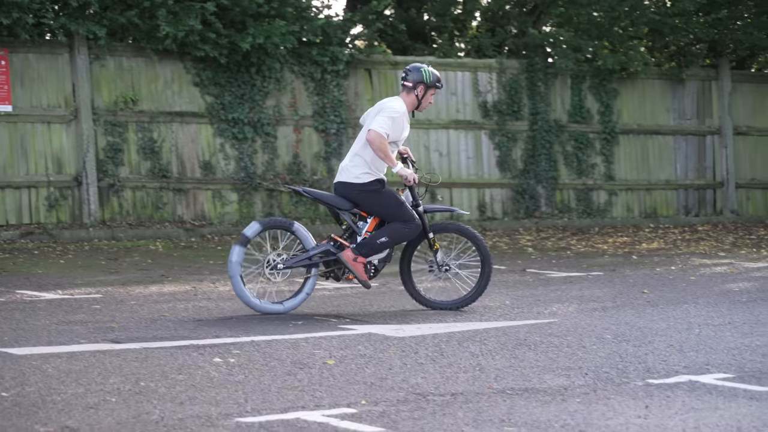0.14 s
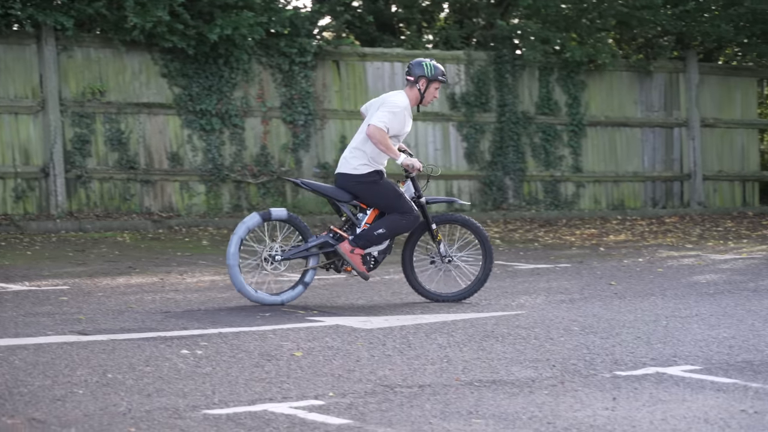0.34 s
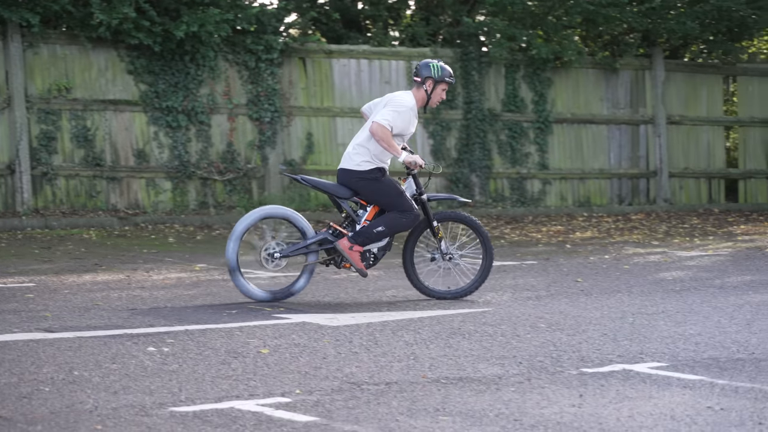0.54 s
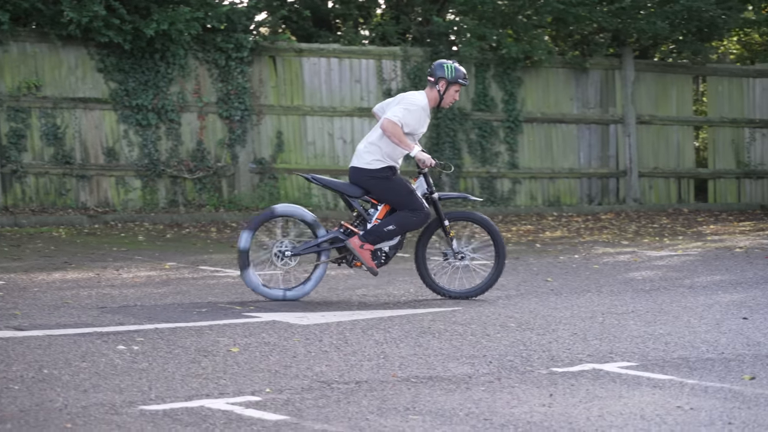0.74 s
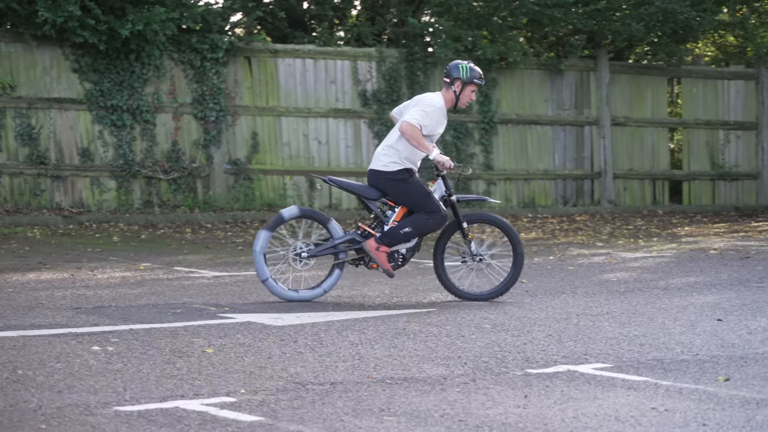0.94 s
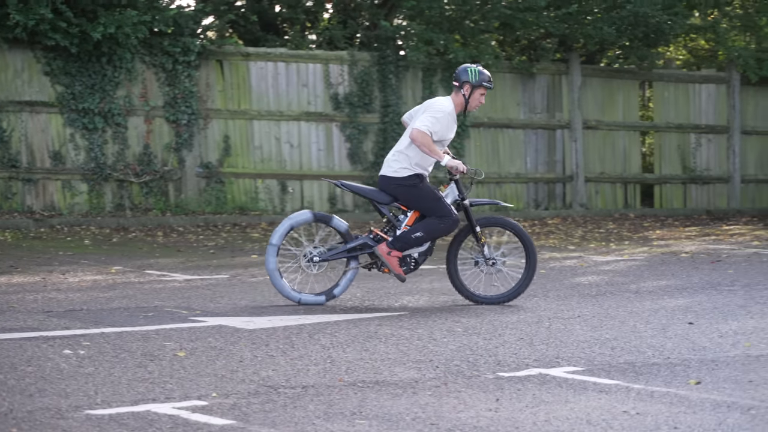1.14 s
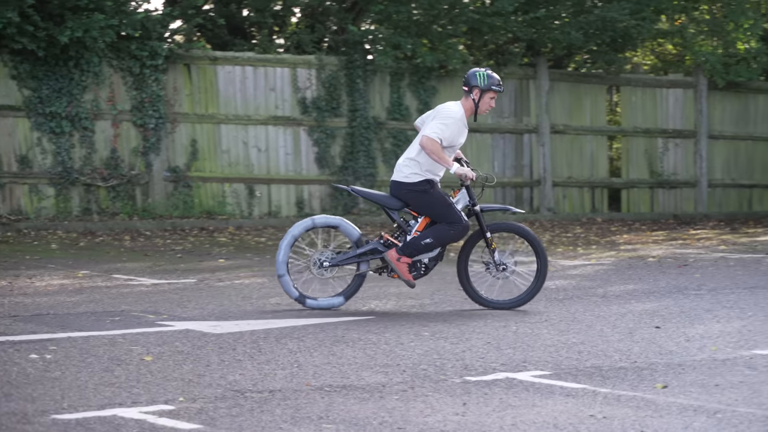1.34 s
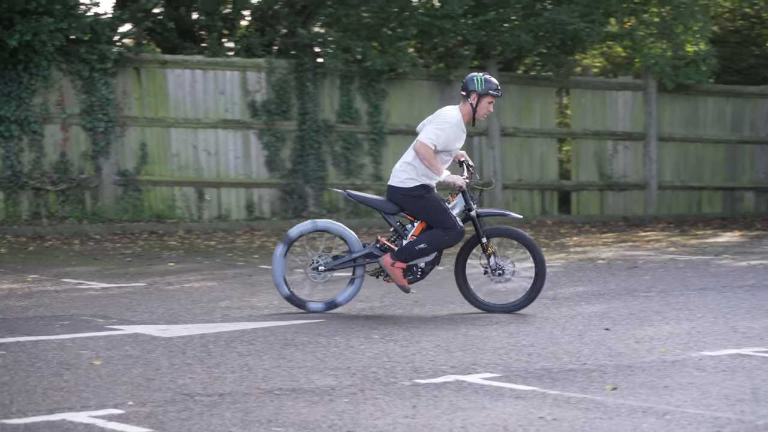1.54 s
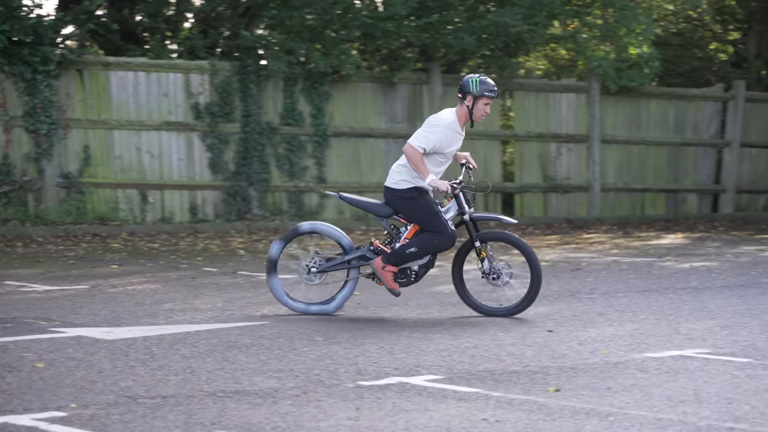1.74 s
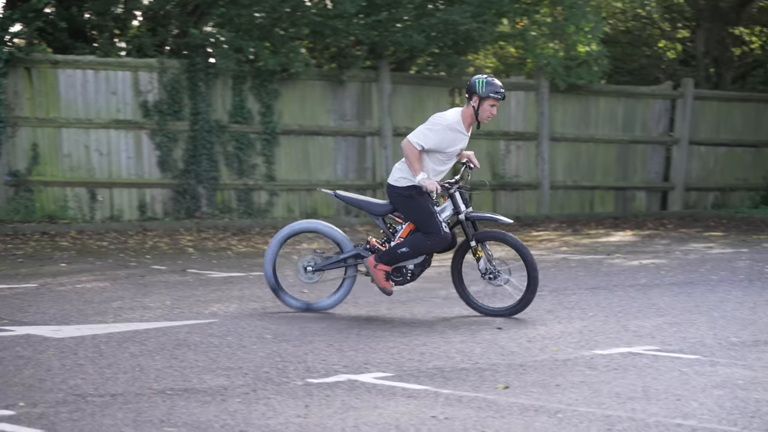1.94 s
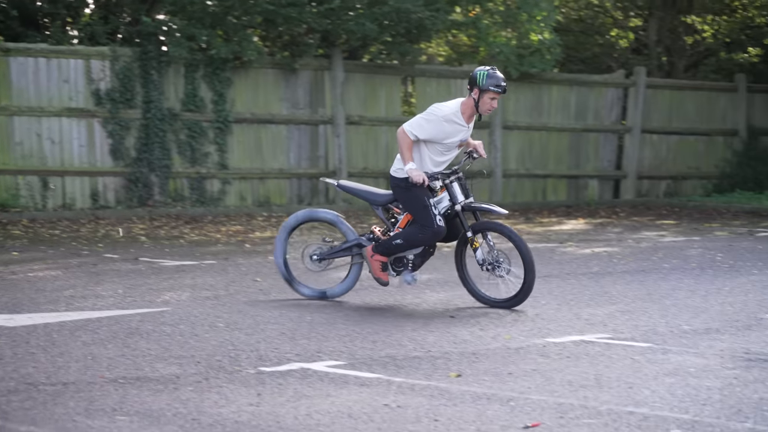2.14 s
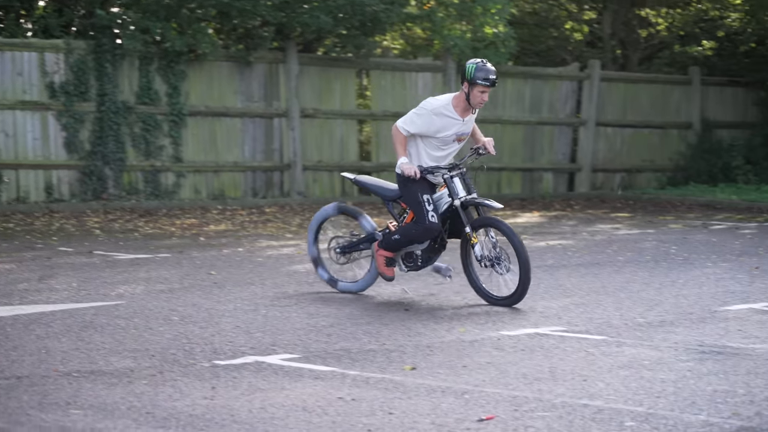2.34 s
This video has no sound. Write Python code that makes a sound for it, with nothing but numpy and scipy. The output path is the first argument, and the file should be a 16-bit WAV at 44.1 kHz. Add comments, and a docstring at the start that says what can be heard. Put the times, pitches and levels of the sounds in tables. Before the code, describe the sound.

Plastic scrapes and cracks on tarmac around a motorbike's spinning rear wheel.

```python
"""An electric motorbike spins its rear wheel, wrapped in plastic guttering, on an open car park's tarmac.
The plastic cracks and scrapes over grit, ringing its hollow wall.
A stick-slip creak, perhaps the brake, ends in single snaps.
One microphone hears the wheel with its low thumps and faint reflections, and a rumble in the distance.
A limiter holds the peaks."""
import sys
import numpy as np
from scipy import signal
from scipy.fft import rfft, irfft
from scipy.io import wavfile
from scipy.ndimage import uniform_filter1d, minimum_filter1d, map_coordinates

SR = 44100
rng = np.random.default_rng(int(sys.argv[2]) if len(sys.argv) > 2 else 0)


def file_out(sig):
    """Save sig as 16-bit WAV at sys.argv[1]."""
    # one column per channel
    cols = np.atleast_2d(sig).T
    # limit, then scale
    lim = np.clip(cols, -1, 1)
    pcm = np.round(lim * 32767).astype(np.int16)
    wavfile.write(sys.argv[1], SR, pcm)


N = 110250

# Scrapes on the tarmac. Each row: start and length in seconds, relative body, rasp and hiss levels in dB.
SCRAPES = [(0.191, 0.0096, -60, -44, -29), (0.431, 0.086, -31.5, -37, -59), (0.486, 0.011, -41, -22.5, -20),
           (0.523, 0.031, -19, -19, -24.5), (0.608, 0.048, -15, -20, -27.5),
           (0.685, 0.039, -16, -21, -28.5), (0.744, 0.016, -23.5, -17.5, -29.5),
           (0.776, 0.028, -28.5, -19, -25.5), (0.797, 0.027, -22, -22.5, -23),
           (1.078, 0.032, -47, -31.5, -42), (1.475, 0.007, -25, -23, -32), (1.494, 0.024, -21, -23, -35),
           (1.527, 0.024, -17, -23, -28.5), (1.631, 0.029, -25, -36, -34.5),
           (1.762, 0.024, -18.5, -17, -26), (1.796, 0.038, -22, -16.5, -22),
           (1.857, 0.0052, -16.5, -16.5, -35), (1.924, 0.069, -26, -19, -25.5),
           (2.019, 0.089, -31, -16, -26.5), (2.189, 0.01, -16.5, -16.5, -28), (2.22, 0.055, -29, -21, -27),
           (2.319, 0.0093, -26, -17, -26.5)]
# Steady drag between scrapes. Each row: time in seconds, relative rasp and hiss levels in dB.
DRAG = [(0, -42, -49), (.14, -48, -52.5), (.34, -38, -45.5), (.47, -47, -49), (.57, -23.5, -26.5),
        (.82, -29, -34.5), (.98, -35, -44.5), (1.31, -48, -58.5), (1.57, -33, -37.5), (1.71, -30.5, -42),
        (1.85, -29, -28), (2.12, -24, -25), (2.5, -28.5, -34)]
# Cracking plastic and struck grit. Each row: start in seconds, pitch in Hz, relative ring and tick in dB.
CRACKS = [(0.038, 3720, -28.5, -28.5), (0.0873, 4060, -22.5, -14), (0.305, 1730, -23.5, -60),
          (0.69, 2300, -7.5, -43), (1.0284, 1520, -33.5, -23.5), (1.1523, 1450, -22.5, -41),
          (1.338, 2500, -29.5, -33), (1.408, 2750, -15.5, -25), (1.5021, 1040, -10, -24),
          (1.609, 1830, -19.5, -27.5)]
# Stick-slip creak. Each row: time in seconds, mean slips per second, relative level in dB.
CREAK = [(.275, 220, -43), (.31, 380, -45), (.345, 470, -34), (.375, 420, -29.5), (.387, 152, -23),
         (.434, 150, -20.5)]
# Single slips. Each entry: time in seconds.
SNAP_TIMES = [0.4445, 0.4628, 0.4792, 0.5197, 1.4552, 1.486, 1.5592, 1.7572]
# Hollow crunches. Each row: middle and half length in seconds, resonance in Hz, level in dB.
CRUNCHES = [(0.706, 0.02, 566, -18.5), (0.809, 0.019, 1010, -13), (0.914, 0.05, 1980, -30.5),
            (1.11, 0.019, 318, -34), (1.789, 0.024, 1080, -15.5), (2.029, 0.017, 890, -16.5),
            (2.239, 0.013, 790, -16.5)]
# Booms and squeaks of the buckling gutter. Each row: start in seconds, pitch in Hz, level in dB.
BUCKLES = [(0.623, 370, -11), (0.631, 594, -7), (1.656, 1210, -14), (1.986, 547, -6.5), (2.114, 4050, -14),
           (2.247, 3670, -16)]
# Wheel thumps. Each row: start in seconds, level in dB.
THUMPS = [(0.732, -17.5), (1.727, -24.5)]
# Tone of the gutter's hollow body, rasping wall and hissing edge; tone of the creak; tone of the open air.
# Each row: frequency in Hz, relative gain in dB.
BODY_SPECTRUM = [(70, -24.5), (150, -10), (260, 1.5), (380, -1), (490, -7), (570, 4), (700, -7), (900, -2),
                 (1400, -11), (3000, -49.5)]
RASP_SPECTRUM = [(450, -28), (950, -8), (1500, -3), (2400, -6), (3750, -7.5), (5200, -11), (7000, -18.5),
                 (16000, -45)]
HISS_SPECTRUM = [(2500, -36), (5000, -12.5), (7200, -5.5), (12500, -2.5), (16000, -4.5)]
CREAK_SPECTRUM = [(1500, -30), (4200, -22), (5100, -12), (5700, -6.5), (6200, -19), (7500, -16), (8200, -6),
                  (8900, 0), (10100, -5), (11000, -13), (16000, -23)]
OUTDOOR_SPECTRUM = [(20, -17.5), (62, 3), (120, -6.5), (450, -19), (800, -14.5), (1600, -13.5),
                    (2400, -33.5), (16000, -83)]
# Fade of the distant rumble. Each row: time in seconds, relative level in dB.
RUMBLE_FADE = [(1.75, 5), (2.05, -3)]


def scraping(attack_s=0.0043, release_s=0.01, judder_hz=169.75, judder_db=2):
    """Drag and scrapes drive juddering grit into the gutter's hollow body, wall and sharp edge."""
    rasp_db, hiss_db = curve(DRAG)
    body_db = rasp_db - 5.5
    power = undb([body_db, rasp_db, hiss_db]) ** 2
    for start, length, *levels_db in SCRAPES:
        press = np.minimum(since(start) / attack_s, 1) * np.exp(-since(start + length) / release_s)
        power += np.outer(undb(levels_db), press) ** 2
    judder = unit(undb(judder_db * walk(judder_hz)))
    body_drive, rasp_drive, hiss_drive = np.sqrt(power) * judder
    pops = undb(-5.5) * stones(rasp_drive, centre_hz=1890, decay_cycles=4.07)
    chips = stones(hiss_drive, centre_hz=8480, decay_cycles=6.1)
    body = drift(colour(grit() * body_drive, BODY_SPECTRUM))
    rasp = undb(-1) * colour(grit() * rasp_drive, RASP_SPECTRUM)
    hiss = colour(grit() * hiss_drive, HISS_SPECTRUM)
    return body + rasp + hiss + pops + chips


def grit(grains_per_s=3300, spread_db=2):
    """The plastic catches on stone tips in dense clicks of uneven size."""
    hits = rng.random(N) < grains_per_s / SR
    polarity = np.sign(rng.standard_normal(N))
    size = undb(spread_db * np.clip(rng.standard_normal(N), -2, 2))
    return unit(hits * polarity * size)


def stones(drive, centre_hz, decay_cycles, per_s=420, spread_octaves=1.84):
    """Larger stones flick the plastic, each ringing for a few cycles at its own pitch."""
    out = np.zeros(2 * N)
    age = since(0)[:SR // 20]
    for when, pitch, size in rng.random((int(per_s * N / SR), 3)):
        i = int(when * N)
        hz = min(centre_hz * 2 ** (spread_octaves * (2 * pitch - 1)), SR / 2)
        strength = drive[i] * (1 - np.log(1 - size))
        out[i:i + len(age)] += strength * np.exp(-age * hz / decay_cycles) * np.sin(2 * np.pi * hz * age)
    return out[:N]


def drift(x, spread_s=0.00151, rate_hz=24.99):
    """The resonances wander as the contact moves round the gutter."""
    warped_time = since(0) + spread_s * walk(rate_hz)
    return map_coordinates(x, [warped_time * SR], mode="nearest")


def cracks(burst_s=0.0055, tail_s=0.0042, tail_db=-17.5, body_share_db=-9.5):
    """Sharp bursts with a crumbling tail ring a piece of the plastic, its edge and the hollow body."""
    parts = 0
    for start, hz, ring_db, tick_db in CRACKS:
        age = since(start)
        burst = (age > 0) * (np.exp(-(age / burst_s) ** 2) + undb(tail_db) * np.exp(-age / tail_s))
        noise = rng.standard_normal((3, N))
        noise[0] = unit(signal.lfilter(*signal.iirpeak(hz, Q=3.4, fs=SR), noise[0]))
        levels = undb([ring_db, tick_db, ring_db + body_share_db])
        parts += burst * levels[:, None] * noise
    piece, edge, body = parts
    return undb(-1) * (piece + colour(edge, HISS_SPECTRUM) + colour(body, BODY_SPECTRUM))


def crunches():
    """The tyre crushes a stretch of gutter: grit swells into one broad resonance."""
    out = 0
    for middle, half_length, hz, db in CRUNCHES:
        wall = signal.iirpeak(hz, Q=1.6, fs=SR)
        ringing = signal.lfilter(*wall, signal.lfilter(*wall, grit()))
        press = np.exp(-((since(0) - middle) / half_length) ** 2)
        out += undb(db) * press * unit(ringing)
    return out


def buckling(rise_s=0.0032, pitch_spread_hz=58.8):
    """The gutter buckles with brief, wavering booms and squeaks."""
    waver = pitch_spread_hz * np.cumsum(walk(150)) / SR
    return sum(undb(db) * swell(start, rise_s) * np.sin(2 * np.pi * (hz * since(start) + waver))
               for start, hz, db in BUCKLES)


def creak(jitter=0.07, chatter_s=0.0013):
    """Stick-slip pulses, perhaps the brake, quicken, then slow and grow, ending in single snaps."""
    rate, level_db = curve(CREAK)
    creaking = (since(CREAK[0][0]) > 0) & (since(CREAK[-1][0]) == 0)
    slip_count = np.cumsum(rate * (1 + jitter * walk(280)) * creaking) / SR
    slips = np.diff(np.floor(slip_count), prepend=0) * undb(level_db)
    for start in SNAP_TIMES:
        slips[int(start * SR)] += undb(-16)
    chatter = smear(slips, np.exp(-since(0) / chatter_s)) * rng.standard_normal(N)
    return undb(17.5) * colour(slips + undb(-1) * chatter, CREAK_SPECTRUM)


def thumps(hz=50, rise_s=0.0057):
    """The wheel thumps, each time a deep tone that dies within a few cycles."""
    return sum(undb(db) * swell(start, rise_s) * np.sin(2 * np.pi * hz * since(start))
               for start, db in THUMPS)


def reflections(wheel, level_db=-17.5, decay_s=0.011):
    """The car park returns a faint, short, diffuse tail to the microphone."""
    tail = rng.standard_normal(N) * np.exp(-since(0) / decay_s)
    return undb(level_db) * smear(wheel, tail)


def outdoors():
    """Low rumble and a soft rush from far off, fading near the end."""
    level_db = curve(RUMBLE_FADE)[0] - 39
    return undb(level_db) * colour(rng.standard_normal(N), OUTDOOR_SPECTRUM)


def undb(db):
    """Decibels to amplitude."""
    return 10 ** (np.asarray(db) / 20)


def unit(x):
    """Scale to rms 1."""
    return x / np.sqrt(np.mean(x ** 2))


def since(start):
    """Seconds since a moment, zero before it."""
    return np.maximum(np.arange(N) / SR - start, 0)


def curve(table):
    """Each level or rate column of a table over time."""
    times, *columns = np.array(table, float).T
    return [np.interp(since(0), times, column) for column in columns]


def walk(hz):
    """Smooth random motion of rms 1."""
    return unit(np.interp(since(0) * hz, np.arange(N), rng.standard_normal(N)))


def swell(start, rise_s):
    """A push that peaks at 1 after the rise time and dies away."""
    rises = since(start) / rise_s
    return rises * np.exp(1 - rises)


def smear(x, tail):
    """Convolve with a tail scaled to unit energy."""
    return signal.fftconvolve(x, tail / np.linalg.norm(tail))[:N]


def colour(x, spectrum):
    """Causal filter through (Hz, dB) points that keeps the power of white noise."""
    hz, db = np.array(spectrum, float).T
    bins_hz = np.maximum(np.arange(N + 1) * SR / (2 * N), 1)
    gain = unit(undb(np.interp(np.log(bins_hz), np.log(hz), db)))
    cepstrum = irfft(np.log(gain))
    cepstrum[1:N] *= 2  # fold onto positive time for minimum phase
    cepstrum[N + 1:] = 0
    return irfft(rfft(x, 2 * N) * np.exp(rfft(cepstrum)))[:N]


def scene():
    """At the microphone, in mono: the wheel in front, its reflections and the open air behind."""
    wheel = cracks() + creak() + buckling() + thumps() + scraping() + crunches()
    return (wheel + reflections(wheel) + outdoors())[None]


def record(dry):
    """After the microphone, a fast limiter holds the peaks and the top treble is cut."""
    limit_db, window_samples, top_hz = -5.5, 65, 15900
    gain = np.minimum(1, undb(limit_db) / (np.abs(dry) + 1e-9))
    gain = uniform_filter1d(minimum_filter1d(gain, window_samples), window_samples)
    lowpass = signal.ellip(10, 0.2, 70, top_hz, fs=SR, output="sos")
    return signal.sosfilt(lowpass, dry * gain)


dry = scene()
out = record(dry)
file_out(out)
```